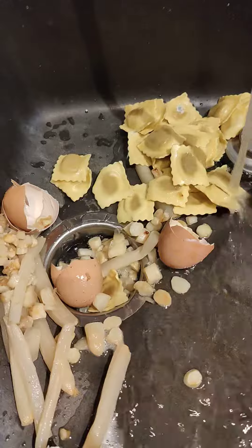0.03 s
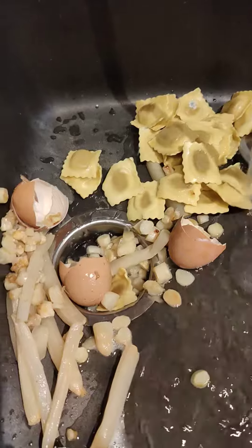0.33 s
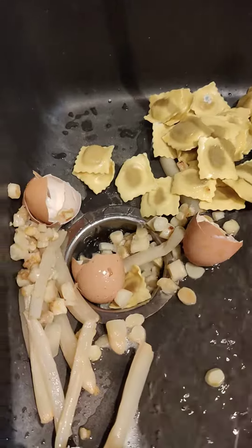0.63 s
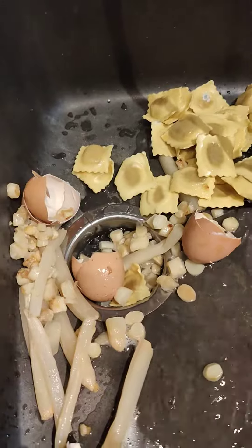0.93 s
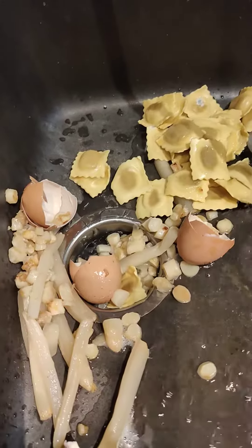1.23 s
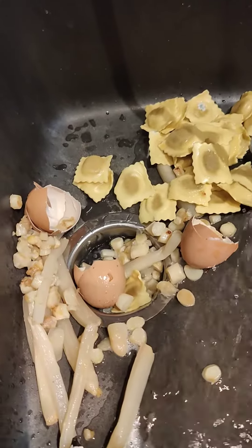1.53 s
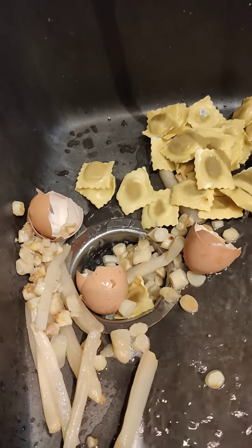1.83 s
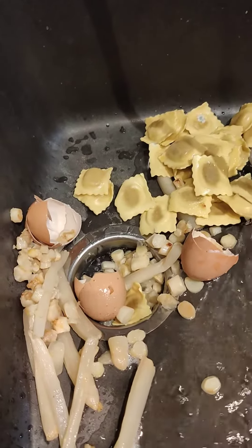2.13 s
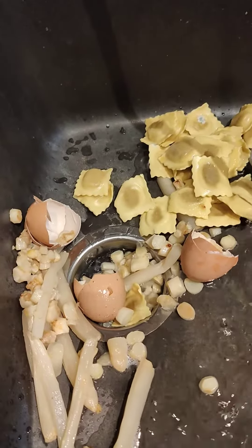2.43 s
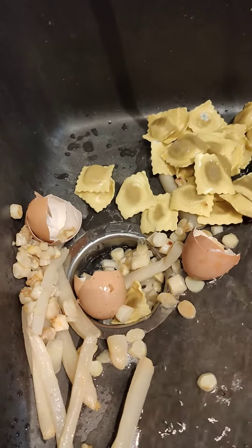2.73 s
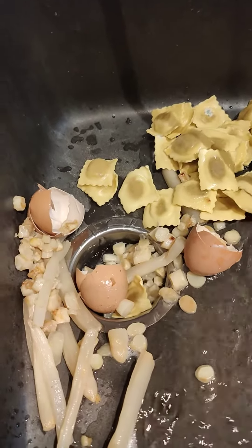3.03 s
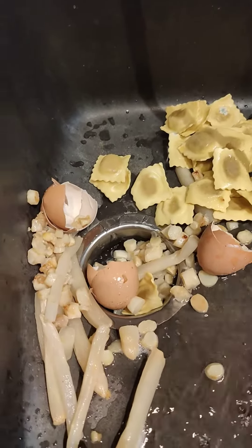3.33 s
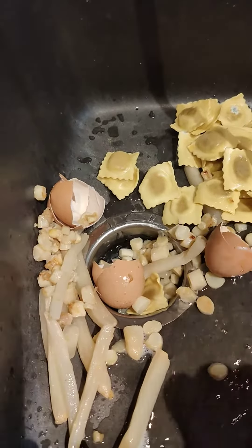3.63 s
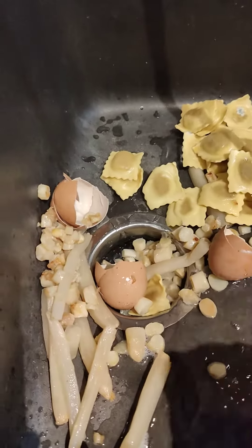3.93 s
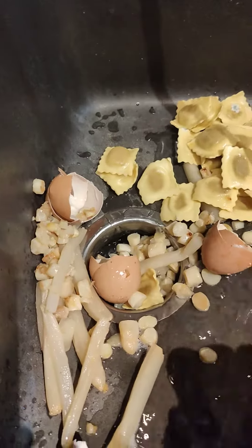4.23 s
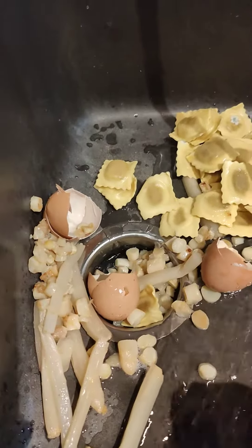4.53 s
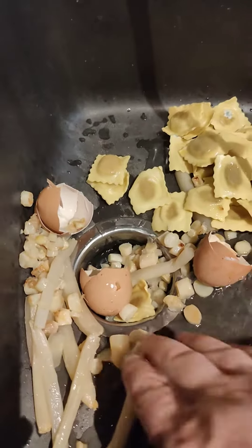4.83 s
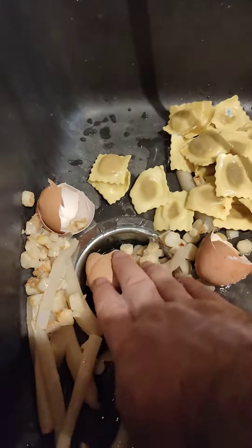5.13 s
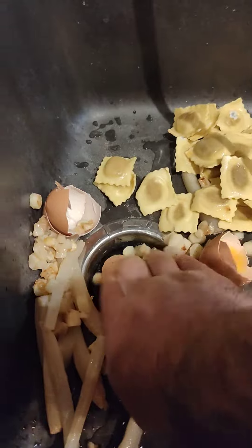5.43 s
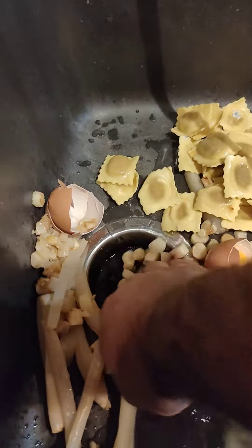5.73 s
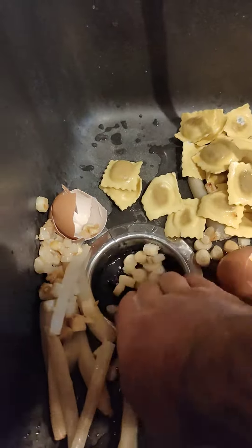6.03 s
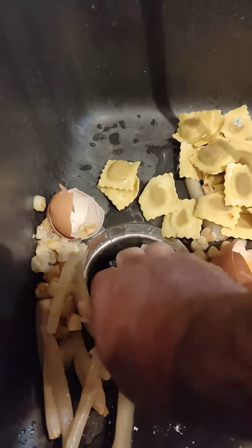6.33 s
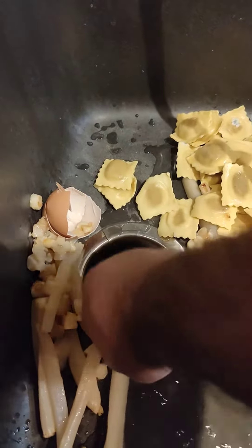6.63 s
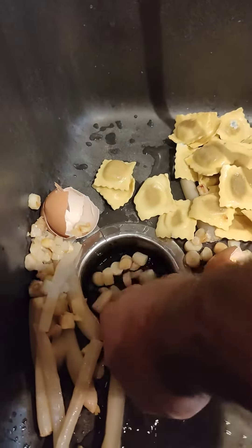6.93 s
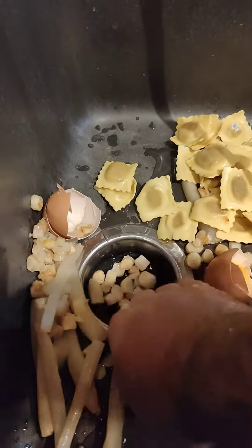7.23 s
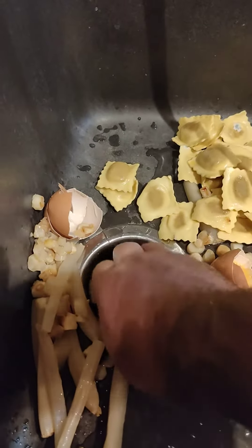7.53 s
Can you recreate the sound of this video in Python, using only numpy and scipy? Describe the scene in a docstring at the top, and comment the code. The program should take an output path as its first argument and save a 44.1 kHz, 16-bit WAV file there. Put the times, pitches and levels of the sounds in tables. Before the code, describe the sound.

Heard close above a kitchen sink, a tap opens and water spatters on the basin. After a few seconds a garbage disposal kicks on with a thud, humming and sloshing the water around. One loud, deep bump shakes the sink and briefly dips the other sounds. Then soft food scraps and eggshells are fed in, and the motor grinds them with irregular wet crunches and sharp cracks under the running water.

```python
"""Tap water splashes into a kitchen sink, and a few soft knocks ring the basin. A waste disposal jolts
on, spins up and churns the water, humming and shaking the sink. The basin takes a heavy thump, then
food scraps go down the drain and crunch against the grinding ring. The microphone is close above the
basin; its gain control turns the sound down after each heavy blow and lets it creep back."""
import sys
import numpy as np
from scipy import signal
from scipy.fft import rfft, irfft, next_fast_len
from scipy.io import wavfile

SR = 44100
rng = np.random.default_rng(int(sys.argv[2]) if len(sys.argv) > 2 else 0)


def transcribe(u):
    """Save the signal u as a 16-bit wav file named by the first command-line argument.

    u: samples, shape (n,) or (channels, n), limited to [-1, 1]; the rate is SR.
    q: integer samples, one column per channel.
    """
    v = np.clip(np.atleast_2d(u).T, -1, 1)
    q = np.round(v * 32767).astype(np.int16)
    wavfile.write(sys.argv[1], SR, q)


N = 334719
T = np.arange(N) / SR
FILTER_SIZE = 8192  # samples
HZ = np.fft.rfftfreq(FILTER_SIZE, 1 / SR)

TAP_ON_S, SWITCH_ON_S = 0.11, 2.699  # the tap opens; the disposal starts
FEED_S, FILL_S = 5.15, 1.36  # scraps start down the drain and take this long to fill the chamber

# Levels in the tables are relative: they compare one row with another.
# Tone of the splash and of its fat spatters (frequency [Hz], level [dB])
SPLASH_TONE = [(59, -20), (100, -12), (158, -32), (194, -9), (264, -21), (568, -12.5), (743, -19.5),
               (914, -6.5), (993, -10.5), (1380, -11.5), (3650, -0.5), (5750, -2), (6510, -3), (7690, -4),
               (14000, -10.5)]
SPATTER_TONE = [(1000, -20.5), (2200, -14.5), (2900, 2.5), (3700, -1), (5300, -7), (6600, 1.5), (7700, -13),
                (11000, -7), (14000, -9)]
# Hollow resonances that colour the splash (frequency [Hz], width [Hz], boost [dB])
SPLASH_RESONANCES = [(189.4, 5.8, 9), (483.5, 23, 7.5), (567, 33, 10), (750, 58, -6), (780, 11, 12),
                     (922, 37, 7.5), (1770, 32, 3.5), (2467, 410, -6.5), (2470, 36, 13), (2643, 28, 10),
                     (2862, 78, -11), (2913, 43, 9), (3640, 37, 2.5), (5040, 62, -9), (5030, 150, 6),
                     (6300, 53, 8.5), (6860, 320, 7.5), (7790, 840, -7), (11660, 550, -0.5)]
# Knocks that ring the basin's notes: blows on the basin, and at 6.536 s a lump hitting the disposal's chamber
# (time [s], level [dB], favoured pitch [Hz], rattle's time to fade 60 dB [s])
KNOCKS = [(0.95, -30.5, 191, 0.25), (0.971, -35, 110, 0.12), (1.016, -32, 65, 0.62),
          (1.092, -33, 300, 0.17), (1.124, -28, 75.6, 0.37), (1.529, -36.5, 90.5, .3),
          (1.918, -42, 42, 0.46), (2.699, -12, 304, 0.069), (2.72, -10, 273, 0.36),
          (4.128, -9.5, 330, 0.094), (4.151, -6, 79, 0.17), (4.175, -11.5, 298, 0.19),
          (4.19, -11, 46, 0.48), (4.68, -34, 27.8, .3), (6.536, -15, 271, 0.066),
          (7.296, -19, 240, 0.22)]
# Notes that the struck basin rings at (frequency [Hz], level [dB], time to fade 60 dB [s])
BASIN_NOTES = [(44, 9.5, 0.8), (63.4, 4, 0.45), (89.6, 7, 0.19), (160, 0, .1), (194.3, 11, 0.086),
               (250, 6.5, 0.069), (336.5, 3, 0.13), (490, 5, 0.13), (657, -1, 0.091), (825, 7.5, 0.12)]
# Tone of the parts that rattle under the basin (frequency [Hz], level [dB])
RATTLE_TONE = [(20, -20), (60, 9.5), (700, 0), (1100, 4.5), (1400, -7), (2000, 4.5), (4000, -8),
               (10000, -26)]
# Puffs of spray from the stream (time [s], length [s], level [dB])
SPRAY_PUFFS = [(2.18, 0.028, -27), (3.48, 0.025, -24.5), (3.57, 0.023, -36), (4.0, .03, -30),
               (4.88, 0.045, -31)]
# Speed that the motor holds once it has spun up (time [s], speed [turns/s])
MOTOR_SPEED = [(3.3, 64.5), (3.8, 63.7), (4.45, 63.3), (4.85, 64), (5.8, 64.5), (6.05, 63.4), (6.55, 62.2),
               (7.1, 62.7), (7.35, 61.7)]
# Tones of the shaking rotor (multiple of the rotor speed [x], level [dB])
ROTOR_TONES = [(1, -11.5), (2, 1), (3, -7.5), (4, -14), (5, -17.5), (6, -10), (8, -14.5), (10, -12.5),
               (11, -10)]
# Slugs of water caught by the rotor (time [s], length [s], level [dB])
WATER_SURGES = [(3.36, 0.11, -28.5), (3.6, 0.24, -32.5), (3.97, 0.093, -25), (4.38, 0.054, -26),
                (4.87, 0.21, -28), (5.22, 0.042, -23.5), (5.51, 0.025, -31), (5.66, 0.29, -28),
                (5.97, 0.056, -22.5), (6.42, 0.055, -25), (6.75, 0.084, -27), (6.92, 0.077, -23.5),
                (7.24, 0.15, -21.5), (7.5, .09, -23)]
# Tone of the churning water and of the deep slosh under it (frequency [Hz], level [dB])
CHURN_TONE = [(100, -26), (330, -23), (450, -8.5), (570, -4.5), (700, -7), (790, -14.5), (1100, -12.5),
              (2000, -16.5), (4000, -50), (12000, -48)]
SLOSH_TONE = [(25, -19), (45, -13), (65, -4.5), (110, -5.5), (185, -9), (290, -14), (430, -9.5),
              (600, -13.5), (1000, -31.5), (4000, -54)]
# Resonances of the disposal's chamber (frequency [Hz], width [Hz], boost [dB])
CHAMBER_RESONANCES = [(194.4, 31, 14), (259, 13, 15), (366.6, 9.9, 15.5), (619.4, 63, 10.5),
                      (690, 46, 12.5), (800, 41, 9), (910, 17, -8)]
# Soft pieces caught on the ring, and eggshell crushed (time [s], length [s], level [dB], pitch [Hz])
SOFT_BITES = [(3.63, 0.1, -30.5, 2240), (3.765, 0.085, -35.5, 2000), (5.174, 0.029, -24.5, 1490),
              (5.294, 0.084, -25.5, 1130), (5.416, 0.11, -31, 1160), (5.564, 0.097, -25, 1150),
              (5.739, 0.12, -26, 1750), (5.892, 0.2, -28.5, 1740), (6.19, 0.154, -25.5, 1900),
              (6.63, 0.066, -24, 1150), (6.785, 0.089, -25.5, 1680), (6.96, 0.15, -26, 1210),
              (7.23, 0.15, -28, 1360), (7.493, .07, -25, 1250)]
SHELL_CRUNCHES = [(5.135, 0.031, -31, 3020), (5.3, .07, -27, 3500), (5.484, 0.079, -25.5, 4500),
                  (5.606, 0.075, -23.5, 4300), (5.79, 0.076, -28.5, 3300), (5.914, 0.16, -29.5, 3470),
                  (6.074, 0.037, -27, 3300), (6.25, 0.11, -21, 3580), (6.388, 0.096, -21, 5000),
                  (6.681, 0.059, -19.5, 4400), (6.861, 0.032, -16.5, 3900), (6.929, 0.036, -24, 2900),
                  (7.118, 0.034, -19, 4300), (7.27, 0.11, -21, 3000), (7.492, 0.075, -22.5, 2900)]
# Tone of soft pulp and of eggshell being ground (frequency [Hz], level [dB])
PULP_TONE = [(400, -33), (850, -9), (1130, -2), (1400, -6.5), (1900, 1), (2400, -4.5), (3500, -14),
             (7000, -28), (14000, -63)]
SHELL_TONE = [(800, 9), (2000, -39), (2700, 2.5), (4200, 1), (5300, -3.5), (7000, -3.5), (8000, -6),
              (14000, -40)]
# Resonances of the grinding ring (frequency [Hz], width [Hz], boost [dB])
RING_RESONANCES = [(1135, 110, 13), (1606, 130, 9), (1790, 75, 5.5), (1940, 130, -8.5), (2170, 50, 8),
                   (2297, 100, -6), (2510, 84, 9.5), (2750, 130, 8.5), (3384, 64, 10), (4370, 95, 10),
                   (4530, 350, 5), (5010, 600, 9), (6170, 49, 12.5), (6850, 390, 13.5)]
# Single pieces cracking (time [s], level [dB], pitch [Hz])
PIECE_CRACKS = [(4.303, -29, 1610), (4.405, -26.5, 1760), (4.448, -18.5, 5940), (4.674, -31.5, 1510),
                (5.203, -19, 1500), (5.262, -24.5, 1280), (5.325, -18.5, 1420), (5.376, -21, 3250),
                (5.64, -18, 2870), (5.787, -14.5, 1670), (5.818, -17.5, 3380), (6.271, -20, 3200),
                (6.537, -14.5, 600), (6.823, -22, 1700), (7.225, -25.5, 2870)]
# How alike the left and right channels are (frequency [Hz], correlation [-1 to 1])
STEREO_LIKENESS = [(50, 1), (180, 0.99), (280, 0.57), (400, 0.71), (600, 0.58), (720, 0.78), (880, -0.38),
                   (1010, -0.16), (1150, 0.16), (1350, -0.41), (1620, 0.14), (2050, -0.17), (2550, 0.43),
                   (3200, -0.17), (3700, 0.1), (5100, -0.31), (5800, -0.16), (7500, -0.0095)]
# How the basin's reflections lean to one side (frequency [Hz], left minus right [dB])
STEREO_LEAN = [(50, 2), (200, 4.5), (310, -5), (440, -2.5), (590, 7), (780, 1), (930, -5), (1350, 2.5),
               (1750, 2), (2300, 1), (6000, -1), (7000, 2.5), (11000, 5.5), (12500, 1)]


def amp(db):
    """Turns decibels into a gain."""
    return 10 ** (np.asarray(db) / 20)


def unit(x):
    """Scales a signal to an average power of 1."""
    return x / np.sqrt(np.mean(x ** 2) + 1e-20)


def add(mix, start_s, sound):
    """Mixes a sound in at a given time."""
    part = mix[:, round(start_s * SR):][:, :sound.shape[-1]]
    part += sound[..., :part.shape[-1]]


def ramp(start_s, length_s):
    """Rises in a straight line from 0 to 1."""
    return np.clip((T - start_s) / length_s, 0, 1)


def fade(t, t60):
    """Dies away by 60 dB every t60 seconds."""
    return np.exp(-np.log(1000) * t / t60)


def swell(t, length, attack, release):
    """Rises around t = 0, holds until length, then fades 60 dB in release (all in seconds)."""
    return np.clip(t / attack + .5, 0, 1) * fade(np.clip(t - length, 0, 2 * release), release)


def bursts(rows, attack, release):
    """Total power of swells given as (time [s], length [s], level [dB])."""
    return sum((amp(db) * swell(T - s, length, attack, release)) ** 2 for s, length, db in rows)


def wander(rate_hz):
    """A smooth random wobble, up to about rate_hz swings a second."""
    hz = np.fft.rfftfreq(N, 1 / SR)
    return unit(irfft(rfft(rng.standard_normal(N)) / (1 + (hz / rate_hz) ** 2), N))


def lag(x, seconds):
    """Follows x sluggishly, smoothing out quick changes."""
    keep = np.exp(-1 / (seconds * SR))
    return signal.lfilter([1 - keep], [1, -keep], x)


def curve_at(points, hz):
    """Reads between the rows of a frequency table, with octaves evenly spaced."""
    table_hz, value = np.transpose(points)
    return np.interp(np.log(hz + 1), np.log(table_hz + 1), value)


def response(tone, resonances):
    """A broad tone curve with narrow peaks and dips on it, in dB."""
    peaks = sum(db / (1 + (2 * (HZ - hz) / width) ** 2) for hz, width, db in resonances)
    return curve_at(tone, HZ) + peaks


def hump(hz, centre_hz, slope_db):
    """A tone curve in dB that peaks at one pitch and, far from it, falls slope_db an octave."""
    return -slope_db * (np.hypot(np.log2((hz + 1) / centre_hz), .5) - .5)


def colour(x, curve_db):
    """Filters x by a tone curve so that resonances ring after each impact, never before it."""
    log_gain = np.log(amp(np.maximum(curve_db - curve_db.max(), -100)))
    mirrored = np.concatenate([log_gain, log_gain[-2:0:-1]])
    spectrum = np.exp(np.conj(signal.hilbert(mirrored)))  # minimum phase
    ringing = np.fft.ifft(spectrum).real[:FILTER_SIZE // 2]
    return signal.oaconvolve(x, ringing[None], axes=1)[:, :x.shape[1]]


def stereo_noise(count):
    """Noise whose left and right are alike in the bass and nearly unrelated in the treble."""
    a, b = rfft(rng.standard_normal((2, count)))
    likeness = np.clip(curve_at(STEREO_LIKENESS, np.fft.rfftfreq(count, 1 / SR)), -1, 1)
    mid, side = a * np.sqrt((1 + likeness) / 2), b * np.sqrt((1 - likeness) / 2)
    return irfft(np.array([mid + side, mid - side]), count)


def impacts(per_s, spread_db, t60, echo, echo_t60):
    """A shower of tiny hits of random size, each a snap and its echo between the basin walls."""
    sizes = amp(spread_db * np.minimum(rng.exponential(1, N), 4))
    hits = sizes ** 2 * (rng.random(N) < per_s / SR)
    t = T[:FILTER_SIZE]
    snap, scatter = fade(t, t60) ** 2, fade(t, echo_t60) ** 2
    power = signal.oaconvolve(hits, snap / snap.sum() + echo * scatter / scatter.sum())[:N]
    return unit(np.sqrt(abs(power)) * stereo_noise(N))


def gurgle(x, depth_db, band_hz, life_s):
    """Air pockets open and close in the wet mass, each lifting one narrow band for a moment."""
    spectra = signal.stft(x, nperseg=512, noverlap=384)[2]
    frame_s, bin_hz = 128 / SR, SR / 512
    pocket = np.outer(signal.windows.gaussian(31, band_hz / bin_hz / 2),
                      signal.windows.gaussian(31, life_s / frame_s / 2))
    pockets = unit(signal.fftconvolve(rng.standard_normal(spectra.shape[1:]), pocket, "same"))
    spectra = spectra * amp(depth_db * np.minimum(pockets, 2.5))
    return unit(signal.istft(spectra, nperseg=512, noverlap=384)[1][:, :N])


def tap():
    """The stream breaks into drops on the basin; it sputters, throws fat spatters and traps bubbles."""
    sputter = amp(0.76 * wander(61))
    drops = impacts(1300, spread_db=2, t60=0.021, echo=1, echo_t60=0.9)
    drops = gurgle(drops * sputter, depth_db=2, band_hz=560, life_s=0.012)
    splash = unit(colour(drops, response(SPLASH_TONE, SPLASH_RESONANCES)))
    spatters = impacts(60, spread_db=2.5, t60=0.043, echo=0.37, echo_t60=0.047)
    spatters = gurgle(spatters, depth_db=4.5, band_hz=490, life_s=0.025)
    spatters = unit(colour(spatters, curve_at(SPATTER_TONE, HZ)))
    pings = bubbles(400, low_hz=2760, high_hz=7500, pitches=36)
    flow = ramp(TAP_ON_S, 0.023) * amp(-49 + 15.5 * ramp(TAP_ON_S, 0.24))  # trickle to full stream
    return flow * (amp(9) * splash + amp(2) * spatters + amp(-11) * pings)


def bubbles(per_s, low_hz, high_hz, pitches):
    """Small bubbles ping with a rising pitch, scattered left and right."""
    out, t = np.zeros((2, N)), T[:1024]
    per_pitch = int(per_s * N / SR / pitches)
    for hz in np.geomspace(low_hz, high_hz, pitches):
        cycles = t * hz
        ping = fade(t, 7.2 / hz) * np.sin(2 * np.pi * cycles * (1 + 0.0017 * np.minimum(cycles, 20)))
        when, size, side = rng.random((300, 3))[:per_pitch].T
        for start_s, gain, pan in zip(when * T[-1], amp(17 * size ** 2), side * np.pi):
            add(out, start_s, gain * np.outer([np.cos(pan), np.sin(pan)], ping))
    return unit(out)


def drain():
    """Water running down the pipe rumbles faintly."""
    rumble = unit(colour(stereo_noise(N), hump(HZ, 87, slope_db=8.5)))
    return amp(-57.5) * ramp(0.1, 1) * rumble


def blows():
    """Each blow rings the basin and rattles what hangs from it, favouring the notes near its own pitch."""
    out, t, onset = np.zeros((2, N)), T[:SR // 2], SR // 40
    contact = 1 - np.exp(-t / 0.003)  # the force builds over a few milliseconds
    # Neighbouring notes swing in opposite directions under the microphone.
    notes = [(-1) ** k * amp(db) * fade(t, t60) * np.sin(2 * np.pi * hz * t)
             for k, (hz, db, t60) in enumerate(BASIN_NOTES)]
    note_hz = np.transpose(BASIN_NOTES)[0]
    for start_s, db, pitch, t60 in KNOCKS:
        damping = fade(t, 7.5 * t60)  # a dead blow also chokes the ringing
        ring = contact * damping * (amp(hump(note_hz, pitch, slope_db=9.5)) @ notes)
        rattle_db = hump(HZ, pitch, slope_db=4.5) + curve_at(RATTLE_TONE, HZ)
        rattle = colour(stereo_noise(len(t)) * contact * fade(t, t60), rattle_db)
        blow = amp(-5.5) * ring / ring[:onset].std() + amp(-10) * rattle / rattle[:, :onset].std()
        add(out, start_s, amp(db) * blow)
    return out


def spits():
    """The stream spits brief puffs of fine, bright spray."""
    droplets = impacts(1500, spread_db=10, t60=0.01, echo=0.7, echo_t60=0.08)
    spray = unit(colour(droplets, hump(HZ, 9500, slope_db=14)))
    return np.sqrt(bursts(SPRAY_PUFFS, attack=0.01, release=0.06)) * spray


def motor_hum(mains_hz=50):
    """The motor's coils hum at twice the mains frequency, violently while the starting current flows."""
    t = np.maximum(T - SWITCH_ON_S, 0)
    pull = np.sin(2 * np.pi * 2 * mains_hz * t)
    jolt = np.minimum(t / 0.0014, 1) * fade(np.maximum(t - 0.034, 0), 0.41)
    rattle = unit(colour(stereo_noise(N), hump(HZ, 700, slope_db=14.5))) * (1 + 0.3 * pull)
    hum = pull * amp(1.7 * wander(2.2))
    return jolt * (amp(-16.5) * rattle - amp(-9.5) * pull) + amp(-33) * hum


def spin_up(lag_s=0.08):
    """How much of its running speed the motor has reached, from 0 to 1."""
    return 1 - np.exp(-np.maximum(T - SWITCH_ON_S, 0) / lag_s)


def rotor_shake(turns):
    """The unbalanced rotor shakes the sink at multiples of its speed, less steadily under load."""
    load = ramp(FEED_S, FILL_S)
    unrest = 0.68 + 0.54 * load
    tones = np.zeros(N)
    for multiple, db in ROTOR_TONES:
        phase = 2 * np.pi * (multiple * turns + rng.random()) + 0.044 * unrest * wander(10)
        tones += amp(db + 1.5 * unrest * wander(16)) * np.sin(phase)
    return amp(-26 - 2 * load) * spin_up() ** 1.6 * tones


def churn(turns):
    """Two lugs (the rotor's teeth) slap water against the wall; a deep slosh swells more gently."""
    steady = amp(-31.5 + 7 * ramp(FEED_S, FILL_S))  # louder as scraps fill the chamber
    force = spin_up() * np.sqrt(steady ** 2 + bursts(WATER_SURGES, attack=0.041, release=0.24))
    lugs = 1 + 0.52 * np.cos(4 * np.pi * turns)
    slaps = impacts(420, spread_db=1.5, t60=0.011, echo=0.42, echo_t60=0.086)
    drone = unit(colour(slaps * lugs, response(CHURN_TONE, CHAMBER_RESONANCES)))
    swirl = impacts(500, spread_db=2.5, t60=0.0046, echo=0.43, echo_t60=0.086)
    slosh = unit(colour(swirl, response(SLOSH_TONE, CHAMBER_RESONANCES)))
    return amp(-0.66) * force * drone + amp(-17.5) * np.sqrt(force) * slosh


def pieces(grains, rows, tone_db, slope_db, attack, release):
    """Each piece of food is ground for a moment and favours its own pitch."""
    out, t = np.zeros((2, N)), T[:SR // 2]
    for start_s, length, db, hz in rows:
        first = min(round(start_s * SR), N - len(t))
        piece = unit(colour(grains[:, first:first + len(t)], tone_db + hump(HZ, hz, slope_db)))
        add(out, start_s - attack, amp(db) * swell(t - attack, length, attack, release) * piece)
    return out


def grinding(turns):
    """Scraps are dragged over the ring: soft pieces knock and squelch, eggshell crackles."""
    lugs = 1 + 0.05 * np.cos(4 * np.pi * turns)
    pulp = impacts(420, spread_db=4, t60=0.0046, echo=1, echo_t60=0.21)
    pulp = gurgle(pulp * lugs, depth_db=5, band_hz=70, life_s=0.045)
    shell = impacts(600, spread_db=3.5, t60=0.0097, echo=0.58, echo_t60=0.11)
    shell = gurgle(shell * lugs, depth_db=6.5, band_hz=69, life_s=0.029)
    pulp_db, shell_db = response(PULP_TONE, RING_RESONANCES), response(SHELL_TONE, RING_RESONANCES)
    rub = amp(-33.5) * unit(colour(pulp, pulp_db)) + amp(-35.5) * unit(colour(shell, shell_db))
    bites = pieces(pulp, SOFT_BITES, pulp_db, slope_db=12, attack=0.03, release=0.21)
    crunches = pieces(shell, SHELL_CRUNCHES, shell_db, slope_db=5, attack=0.018, release=0.1)
    return ramp(FEED_S, 0.13) * rub + bites + crunches


def cracks():
    """A larger piece breaks with a short snap and rings the grinding chamber near one pitch."""
    out, t, onset = np.zeros((2, N)), T[:FILTER_SIZE], SR // 100
    for start_s, db, hz in PIECE_CRACKS:
        peaks_db = response([(hz, 0)], RING_RESONANCES + [(hz, hz / 9, 7)])
        ring = colour(stereo_noise(len(t)) * fade(t, 0.051), hump(HZ, hz, slope_db=44) + peaks_db)
        snap = colour(stereo_noise(len(t)) * fade(t, 0.021), hump(HZ, hz, slope_db=10.5))
        crack = amp(-1.5) * ring / ring[:, :onset].std() + amp(-7) * snap / snap[:, :onset].std()
        add(out, start_s, amp(db) * crack)
    return out


def scene():
    """All the sounds together, leaning left or right by frequency as the basin reflects them."""
    speed = spin_up() * np.interp(T, *np.transpose(MOTOR_SPEED))
    turns = np.cumsum(speed) / SR
    water = tap() + spits() + drain()
    disposal = rotor_shake(turns) + motor_hum() + churn(turns) + grinding(turns) + cracks()
    mix = water + disposal + blows()
    size = next_fast_len(N + FILTER_SIZE)
    lean = amp(np.outer([.5, -.5], curve_at(STEREO_LEAN, np.fft.rfftfreq(size, 1 / SR))))
    lean /= np.sqrt((lean ** 2).mean(0))  # keeps the total power
    return irfft(rfft(mix, size) * lean, size)[:, :N]


def record(dry):
    """Gain control dips the sound after heavy blows; big peaks are rounded and the top treble is cut."""
    threshold_db, recover_db_per_s, ignore_below_hz, top_hz = -17.5, 6, 120, 14380
    sensed = signal.sosfilt(signal.butter(2, ignore_below_hz, "high", fs=SR, output="sos"), dry)
    level_db = 10 * np.log10(lag((sensed ** 2).mean(0), seconds=0.057) + 1e-12)
    over_db = np.maximum(level_db - threshold_db, 0)
    recovery = recover_db_per_s * T
    cut_db = np.maximum.accumulate(over_db + recovery) - recovery  # jumps up, then eases off
    ducked = dry / amp(lag(cut_db, seconds=0.0067))
    rounded = ducked / (1 + ducked ** 8) ** (1 / 8)
    low_pass = signal.firwin(601, top_hz, window=("kaiser", 8), fs=SR)
    return signal.oaconvolve(rounded, low_pass[None], "same")


dry = scene()
out = record(dry)
transcribe(out)
```